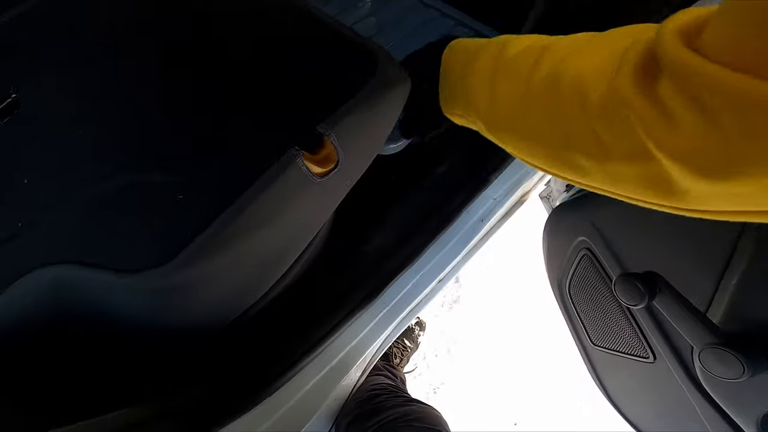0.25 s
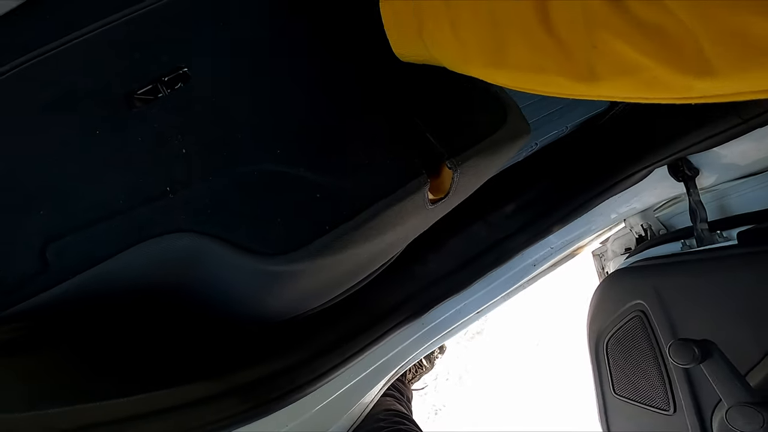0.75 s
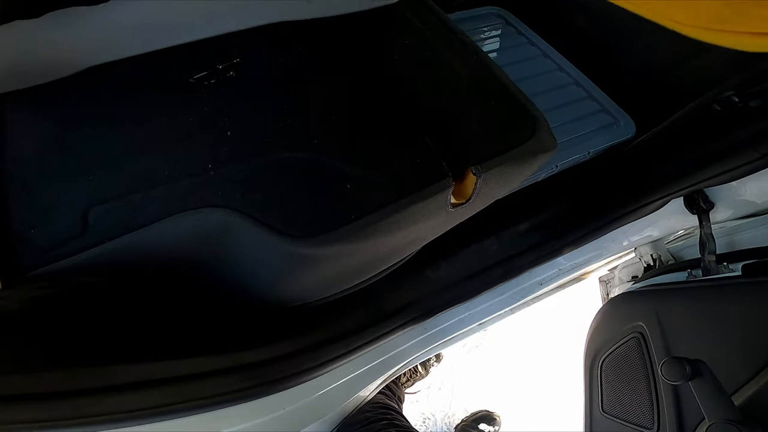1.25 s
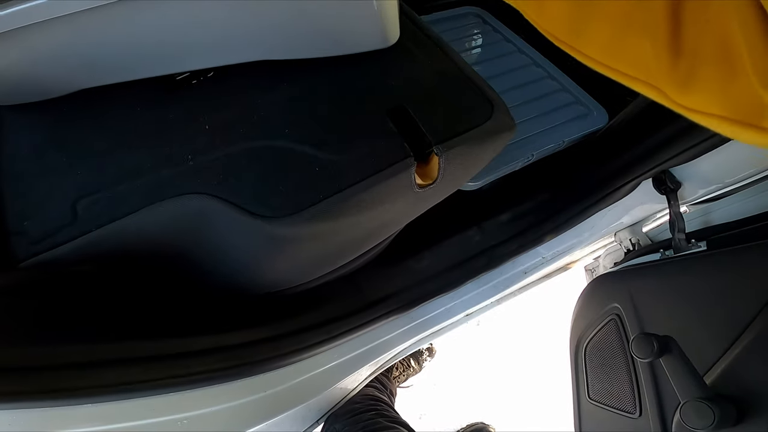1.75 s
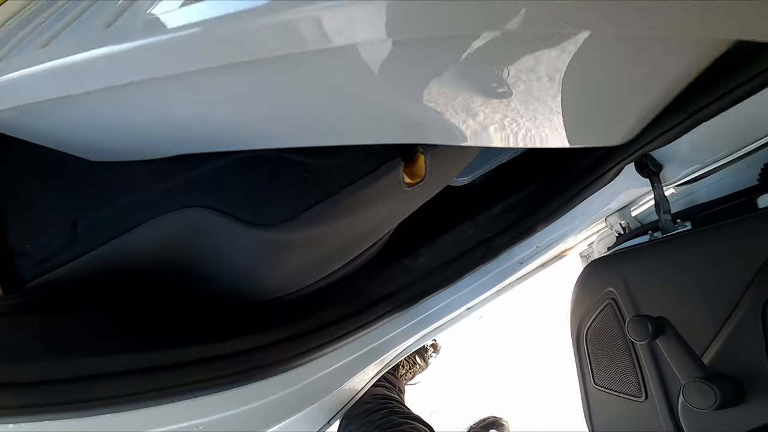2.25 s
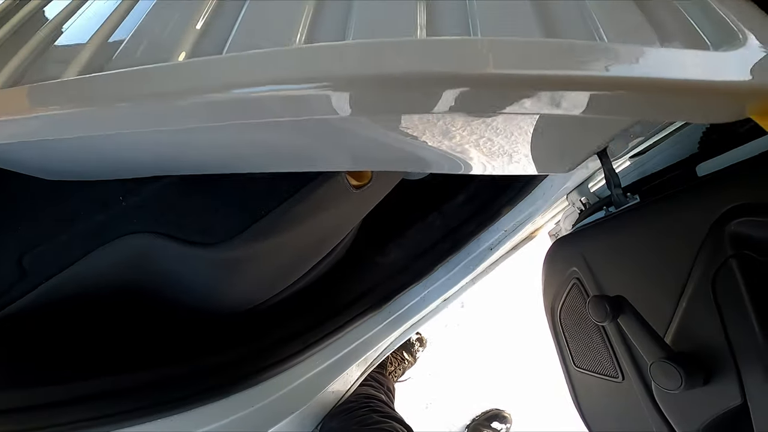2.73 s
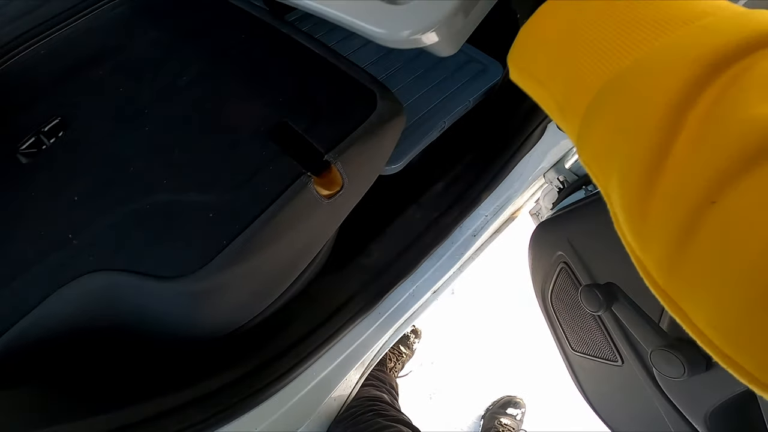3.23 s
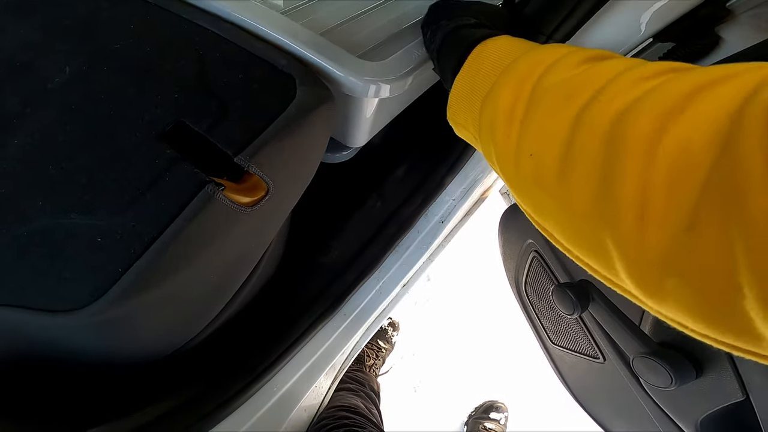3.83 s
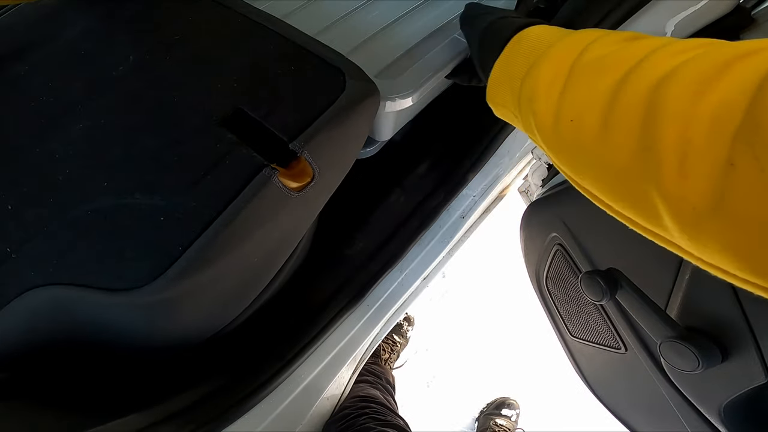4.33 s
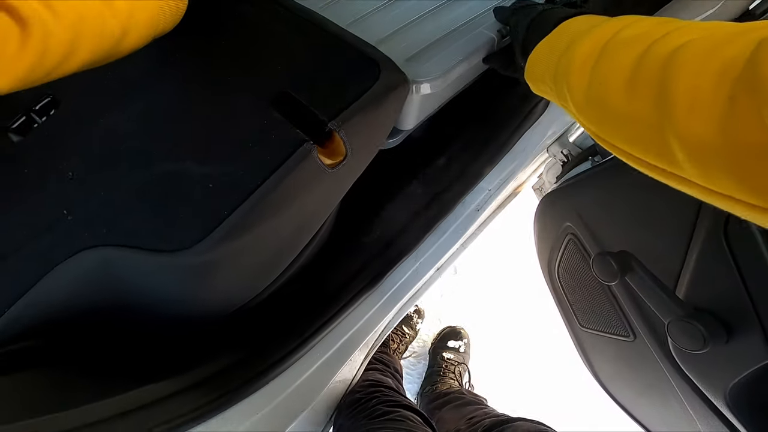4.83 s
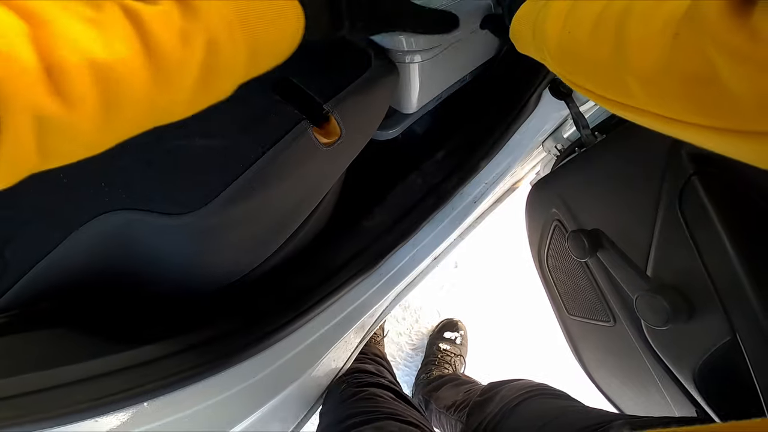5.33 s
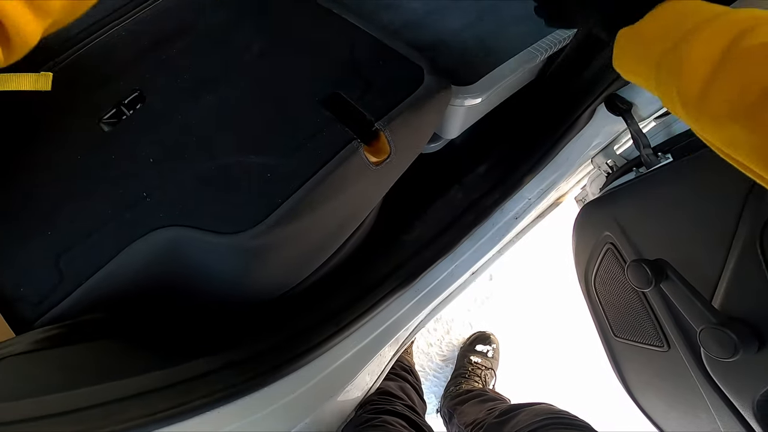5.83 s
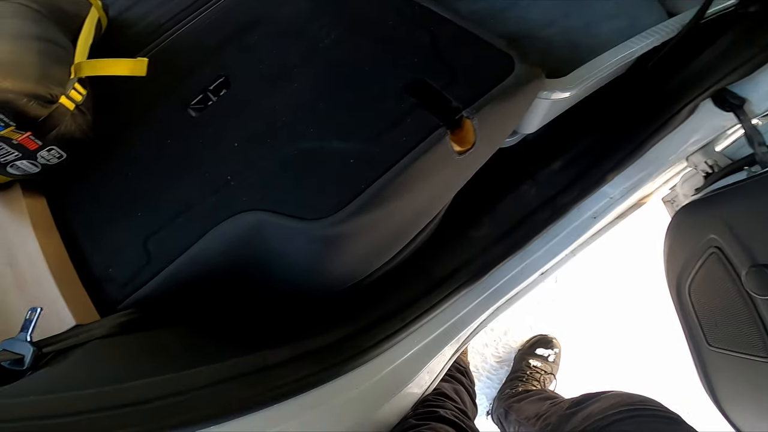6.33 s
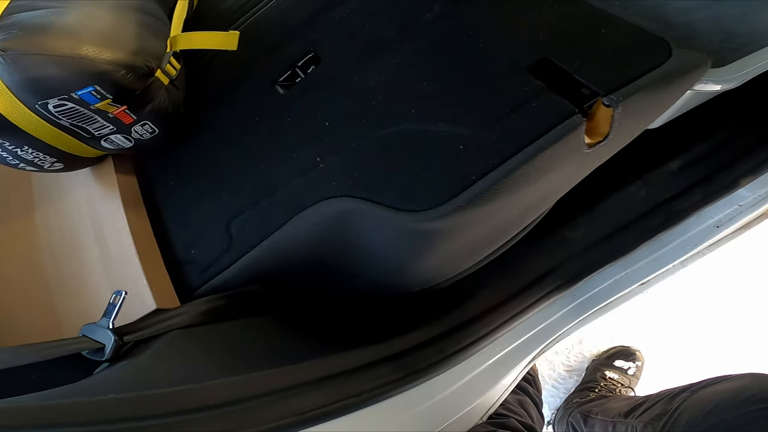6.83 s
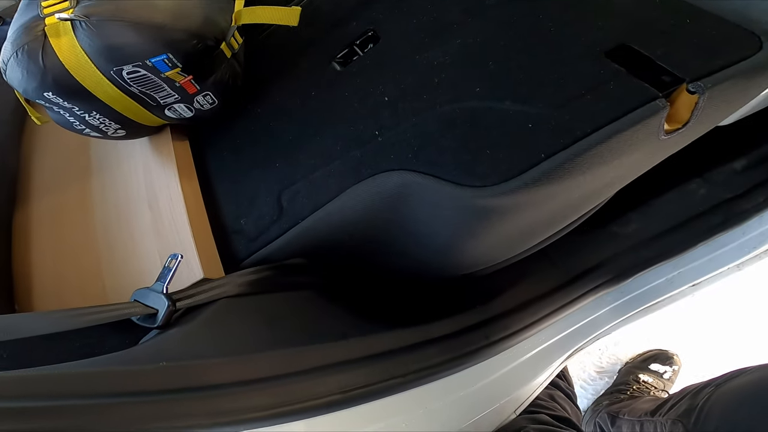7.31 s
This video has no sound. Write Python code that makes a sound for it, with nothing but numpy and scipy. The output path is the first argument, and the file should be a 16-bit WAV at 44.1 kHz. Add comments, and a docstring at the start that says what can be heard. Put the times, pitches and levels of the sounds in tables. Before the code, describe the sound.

A plastic crate is shoved about inside a parked car, heard close, the cabin giving each hit a short, dull tail. It opens with a heavy thump, a clack, a low boom and one brief squeak of a catch. Soft thuds and light clicks follow from about 0.6 to 1.6 seconds. Sharper hollow clacks strike near 1.9, 2.4 and 2.8 seconds. The loudest thumps and clattering plastic edges come between 3.4 and 3.7 seconds and again around 4.2. Between hits the crate drags over carpet and scuffs the trim, a padded jacket rustles, and small hard parts occasionally ping, while the car body booms low under the weight. After a quieter stretch, knocks build from 5.3 seconds into another cluster at 5.7 to 6. Then only faint ticks of shoes and clothing remain, with a soft bump near 7.2 seconds.

```python
"""A plastic crate is shoved about with other gear on the seat and floor of a parked car, its door open.
Blows thump the low modes of crate, seat and floor; hard edges clack on the trim and ring the walls.
Clumps of tiny slips make the drag over carpet, the scuff on trim and a padded jacket's close rustle.
A catch squeaks once at the start, small hard parts ping, and shoes and clothing tick near the end.
Underneath, the body shell booms with the weight; the cabin gives the hits a short, dull tail."""
import sys
import numpy as np
from scipy import signal
from scipy.fft import rfft, irfft
from scipy.io import wavfile

SR = 44100
rng = np.random.default_rng(int(sys.argv[2]) if len(sys.argv) > 2 else 0)


def digitize_waveform(pressure):
    """Quantize a signal to 16-bit integers and store it at the path in sys.argv[1].

    Rows of a 2-D input are taken as channels; values are limited to [-1, 1].
    """
    field = np.atleast_2d(pressure).T
    bounded = np.clip(field, -1, 1)
    quanta = np.round(bounded * 32767).astype(np.int16)
    wavfile.write(sys.argv[1], SR, quanta)


N = 333837

# boom modes of the car's shell: f/Hz, width/Hz, relative level/dB
SHELL_MODES = [(31.7, 6.9, 14), (43.7, 11, 12.5), (66.3, 17.2, 7.5)]
# weight shifting on the shell: t/s, boom level/dB
WEIGHT_SHIFTS = [(0.0, -17), (0.4, -47), (0.74, -48.5), (1.14, -22), (1.26, -24), (1.71, -44.5),
                 (2.21, -38), (2.55, -26.5), (3.1, -52), (3.27, -25.5), (3.42, -39), (3.71, -51),
                 (3.94, -49.5), (4.34, -32.5), (4.45, -45), (4.7, -61), (5.48, -43.5), (5.9, -29.5),
                 (6.49, -52), (6.81, -51), (7.08, -40.5), (7.57, -52.5)]
# how hard things rub: t/s, jacket level/dB, drag level/dB, scuff level/dB
RUB_LEVELS = [(0.0, -47, -13, -64), (0.06, -56, -28, -46.5), (0.21, -66.5, -37, -50.5),
              (0.36, -79, -52, -76.5), (0.59, -64.5, -57, -66), (0.76, -66.5, -51, -61),
              (1.26, -56, -44.5, -55.5), (1.71, -62, -43.5, -55.5), (2.0, -51.5, -40, -53),
              (2.4, -58.5, -42.5, -57), (2.55, -59, -49, -53), (2.78, -66, -47, -61.5),
              (2.93, -62, -44, -57.5), (3.27, -67, -46.5, -60), (3.52, -48, -33.5, -42.5),
              (3.6, -58.5, -37.5, -52.5), (3.92, -55, -34.5, -54.5), (4.11, -62, -38, -55.5),
              (4.28, -81, -39, -65.5), (4.45, -75, -57.5, -73), (4.74, -80, -51, -70),
              (5.02, -60, -43.5, -54), (5.78, -53, -33.5, -48), (5.88, -47, -35, -44),
              (6.09, -75.5, -50, -66), (6.35, -72.5, -48.5, -66), (6.56, -67, -50.5, -60.5),
              (7.57, -73, -44.5, -67)]
# brief dips in the rubbing: middle t/s, depth/dB (negative swells), half length/s
RUB_DIPS = [(0.492, 6.5, 0.061), (0.64, -2, .02), (2.03, 8, 0.08), (3.45, 5, 0.0097), (3.86, 6.5, 0.021),
            (4.025, 17, 0.035), (4.573, 3, 0.029), (4.85, 4, 0.0063), (5.23, 4.5, 0.041), (5.448, 8, 0.025),
            (5.497, 8.5, 0.0085), (5.857, 9.5, 0.0092), (6.079, -12, 0.024)]
# tone of the jacket's cloth: f/Hz, relative level/dB
JACKET_SPECTRUM = [(940, -23), (1600, -16), (1860, -7.5), (2360, -2.5), (3020, -3.5), (4300, -4),
                   (7820, -13.5), (8440, -12), (9020, -13.5), (13700, -22), (15500, -54.5)]
# tone of scuffing on trim: f/Hz, relative level/dB
SCUFF_SPECTRUM = [(350, -32), (600, -2), (1190, -6), (1280, -7.5), (1830, -12.5), (2400, -20), (3120, -56),
                  (5280, -120)]
# tone of the crate on carpet: f/Hz, relative level/dB
DRAG_SPECTRUM = [(35, -44.5), (60, -7.5), (82, -0.5), (107, -8), (199, -4.5), (241, -8), (339, -12.5),
                 (568, -14.5), (1000, -43), (1300, -47), (2200, -120)]
# single strokes of sleeve or crate over a surface: middle t/s, rms level/dB, centre f/Hz, half length/s
BRUSH_STROKES = [(0.956, -65.5, 2680, 0.11), (1.268, -63.5, 4770, 0.17), (1.873, -57, 4950, 0.058),
                 (3.343, -50.5, 3900, 0.014), (4.06, -63, 3900, 0.017), (4.277, -62, 3240, 0.031),
                 (5.05, -57, 2920, 0.035), (5.307, -51, 890, 0.036), (1.451, -52.5, 2500, 0.016),
                 (1.633, -54.5, 2670, 0.018), (1.639, -41, 583, 0.0097), (2.433, -51, 4900, 0.017),
                 (3.546, -44, 3900, 0.0037), (3.632, -51, 3830, 0.058), (3.925, -59.5, 3670, 0.042),
                 (4.15, -28, 2940, 0.0044), (4.667, -71, 3620, 0.057), (4.904, -50, 970, 0.012),
                 (5.122, -45.5, 3500, 0.018), (5.331, -50.5, 3670, 0.013), (5.48, -63, 4350, 0.01),
                 (5.607, -50, 2590, 0.023), (5.725, -52, 3930, 0.058), (6.155, -65.5, 3500, 0.019),
                 (6.549, -66.5, 3640, 0.067), (7.531, -48.5, 288, 0.052)]
# faint ticks of shoes and clothing: t/s, peak level/dB, centre f/Hz
SHOE_TICKS = [(6.287, -48, 630), (6.314, -47, 630), (6.329, -47, 640), (6.346, -46.5, 640),
              (6.388, -51, 1100), (6.498, -47, 872), (6.599, -42, 1310), (6.746, -61, 1610),
              (6.801, -47, 1290), (6.895, -54, 1020), (6.963, -44, 1320), (7.0, -45, 867),
              (7.194, -47.5, 1600), (7.209, -41, 829)]
# small hard parts ringing on one pitch: t/s, f/Hz, level/dB, t60/s
PART_PINGS = [(2.362, 7950, -45, 0.23), (2.363, 10300, -45, 0.13), (3.375, 6000, -39, 0.094),
              (3.376, 8400, -23.5, 0.021), (4.284, 1880, -62, 0.21), (6.052, 3630, -30.5, 0.042),
              (6.055, 8320, -43, 0.06)]
# path of the catch's squeak: t/s, f/Hz, level/dB
CATCH_PATH = [(0.083, 1530, -38), (0.099, 1675, -46.5), (0.155, 1647, -49.5), (0.2, 1660, -54)]
# tone of a plastic edge's chatter: f/Hz, relative level/dB
EDGE_SPECTRUM = [(940, -36.5), (1600, -5.5), (2030, -5), (2650, -5.5), (4860, -7.5), (5500, -9),
                 (6410, -11.5), (8440, -12.5), (10000, -21.5), (15500, -37.5)]
# modes of the crate's stiff rim: f/Hz, half width/Hz
RIM_MODES = [(2500, 210), (3250, 89), (4250, 480), (5500, 280), (8300, 70)]
# modes of the crate's walls: f/Hz, relative level/dB, t60/s
WALL_MODES = [(882, 2.5, .012), (1024, 3, .02), (1230, 5, 0.011), (1397, 3, 0.011), (1630, -5.5, 0.023),
              (1920, -3, .02)]
# hard edge hits: t/s, burst level/dB, wall level/dB, wall f/Hz, burst f/Hz, nominal chatter t60/s
EDGE_HITS = [(0.0412, -24.5, -24.5, 1450, 2220, 0.053), (0.0788, -31, -29, 1410, 3640, 0.21),
             (0.152, -37.5, -47, 1580, 2090, 0.039), (0.254, -52, -76, 980, 3970, 0.015),
             (0.273, -56, -54, 1460, 2350, 0.02), (0.6677, -42, -42.5, 1210, 3760, 0.098),
             (1.126, -44, -46, 1260, 2040, 0.027), (1.1473, -33, -44, 1320, 2400, 0.033),
             (1.4067, -37, -56, 1620, 2100, 0.051), (1.442, -39, -42, 1800, 4670, 0.15),
             (1.481, -37, -34, 990, 3410, 0.016), (1.53, -40.5, -38, 1200, 2750, 0.023),
             (1.558, -32, -34.5, 1140, 4750, 0.02), (1.765, -42, -37.5, 1260, 2030, 0.043),
             (1.8657, -23.5, -19.5, 1460, 2800, 0.024), (1.8807, -25.5, -22, 1080, 2050, 0.071),
             (1.9313, -18, -16, 1440, 2490, 0.014), (1.946, -33, -51, 1190, 3020, 0.035),
             (2.2088, -38, -36, 1490, 2800, 0.033), (2.3306, -36.5, -55, 1670, 2680, 0.04),
             (2.3683, -32, -38, 1270, 3030, 0.041), (2.3815, -13.5, -10.5, 1370, 2580, 0.015),
             (2.384, -9.5, -10.5, 1420, 5500, 0.032), (2.7789, -16.5, -19.5, 1230, 3170, 0.065),
             (2.8574, -37.5, -34, 1300, 2040, 0.17), (2.97, -44.5, -46, 1380, 4600, 0.048),
             (3.035, -32, -43, 1550, 3630, 0.06), (3.235, -34.5, -35, 1540, 3070, 0.076),
             (3.253, -34, -35.5, 1520, 2740, 0.098), (3.3729, -24, -17.5, 1090, 5940, 0.078),
             (3.4028, -24.5, -29, 1450, 2340, 0.16), (3.4789, -14.5, -17.5, 1250, 4000, 0.053),
             (3.4988, -20.5, -23, 1100, 3420, 0.031), (3.5385, -29.5, -43, 1380, 3270, 0.024),
             (3.564, -36, -48, 1160, 3500, 0.012), (3.59, -29.5, -49, 1450, 3540, 0.0078),
             (3.605, -28, -29, 1280, 2760, 0.0087), (3.653, -28, -33, 1340, 3200, 0.085),
             (3.6924, -18, -10.5, 1280, 2920, 0.08), (3.705, -14, -10, 1270, 2550, 0.043),
             (3.889, -39, -41, 1360, 3950, 0.11), (4, -48, -55, 1380, 2200, 0.014),
             (4.133, -26, -26.5, 1130, 2300, 0.059), (4.147, -21.5, -19.5, 1270, 2220, 0.066),
             (4.1736, -17.5, -19, 1060, 3420, 0.12), (4.2008, -9, -16, 1460, 4100, 0.024),
             (4.479, -47.5, -55, 1830, 2500, 0.1), (4.819, -37.5, -41, 1290, 2690, 0.042),
             (4.8346, -39, -60, 1690, 4030, 0.029), (4.9142, -49, -31.5, 1160, 3240, 0.044),
             (5.371, -35.5, -36, 1590, 3770, 0.04), (5.462, -39.5, -40, 1220, 3610, 0.18),
             (5.527, -31.5, -30, 1320, 2070, 0.081), (5.5636, -36, -33.5, 1150, 3890, 0.036),
             (5.682, -21.5, -43, 1380, 4540, 0.055), (5.8215, -15.5, -24, 1380, 2530, 0.034),
             (5.837, -38, -52, 1420, 2300, 0.03), (5.876, -26, -35, 1560, 2790, 0.029),
             (5.886, -18, -27, 1290, 4550, 0.043), (5.925, -22, -27.5, 1680, 3270, 0.022),
             (5.9599, -25.5, -29, 1590, 2060, 0.061), (6.0554, -31, -33, 1320, 3550, 0.066),
             (7.232, -43.5, -40.5, 1220, 2230, 0.045)]
# modes of crate, seat and floor pan: f/Hz
BODY_MODES = [68, 86, 110, 131, 155, 180, 208, 245, 290, 334, 375, 430, 510, 600, 690]
# dull blows on crate and floor: t/s, peak level/dB, centre f/Hz, upper-mode trim/dB, nominal t60/s
BLOWS = [(0.005, -7.5, 166, -31, 0.062), (0.044, -6, 251.5, -19.5, 0.1), (0.062, -20, 213, -28, .1),
         (0.08, -13.5, 81, -5, 0.11), (0.114, -21, 301, -24, 0.37), (0.168, -12.5, 173, -12, 0.12),
         (0.553, -26.5, 102, -23, 0.088), (0.62, -31, 121, -17, 0.022), (0.671, -15.5, 176, -6, 0.061),
         (0.705, -37, 400, -25, 0.055), (0.75, -36.5, 300, -19, 0.08), (0.898, -18.5, 67, -31, 0.36),
         (0.991, -25, 131, -22, 0.16), (1.099, -16.5, 95, -33, 0.079), (1.12, -10.5, 109, -37, 0.19),
         (1.147, -10.5, 123, -26, 0.15), (1.194, -13.5, 84, -51, 0.2), (1.306, -22.5, 93, -46, 0.22),
         (1.317, -32.5, 400, -25, 0.068), (1.399, -22.5, 128, -3.5, 0.081), (1.449, -26.5, 116, -7, 0.24),
         (1.479, -20, 75, 14, 0.08), (1.558, -15.5, 76, -12, 0.17), (1.722, -30, 72.5, -9, 0.077),
         (1.793, -21, 213, -7, 0.074), (1.864, -16.5, 183, 14, 0.087), (1.882, -14, 230, -8, 0.052),
         (1.929, -18, 554, -18, 0.045), (2.208, -22, 470, -34, 0.027), (2.368, -14, 102, -15, 0.34),
         (2.38, -14, 147, -10, 0.14), (2.417, -19.5, 114, -14, 0.4), (2.779, -7, 146, 2, 0.03),
         (2.808, -18.5, 195, -23, 0.12), (2.835, -17.5, 159, -31, 0.066), (2.856, -13.5, 172, -18, 0.1),
         (2.959, -23, 282, -35, 0.078), (3.034, -11, 231, -34, 0.064), (3.139, -27, 99, -25, 0.18),
         (3.232, -11, 96, -18, 0.057), (3.371, -13.5, 606, -44, 0.037), (3.4, -17, 198, -12, 0.14),
         (3.48, -1.5, 204, -10, 0.12), (3.502, -7.5, 182, -15, 0.19), (3.571, -14.5, 414, -32, 0.058),
         (3.624, -18.5, 404, -28, 0.078), (3.646, -9.5, 116.4, -11, 0.051), (3.694, -1, 178, -3.5, 0.12),
         (3.721, -12.5, 129, -20, 0.37), (3.898, -34.5, 175, -15.5, 0.3), (4.133, -9, 183, -17.5, 0.13),
         (4.151, -6, 173.5, -11, 0.15), (4.176, -12, 190, -8, 0.058), (4.202, -2, 190, -6, 0.098),
         (4.22, -14.5, 124, -41, 0.097), (4.446, -34.5, 152, -24, .06), (4.709, -35.5, 70, -30, 0.26),
         (4.819, -26.5, 189, -15, 0.083), (5.028, -30, 74.6, -22, 0.55), (5.335, -22.5, 190, -16.5, 0.27),
         (5.373, -14.5, 220, -22, 0.042), (5.456, -30.5, 198, -41, 0.33), (5.529, -23.5, 207, -21, 0.15),
         (5.564, -21, 85, -7, 0.098), (5.683, -10.5, 169, -9, 0.11), (5.823, -9.5, 136, -12.5, 0.14),
         (5.888, -15.5, 78, -7, 0.095), (5.927, -7, 113, -8.5, 0.048), (5.956, -9.5, 141, -11.5, 0.082),
         (6.059, -27, 75, 5, 0.38), (6.955, -34, 72, -30, 0.1), (7.079, -32.5, 207, -29, 0.16),
         (7.229, -24, 152, -19, 0.11)]


def from_db(db):
    """Decibels to gain."""
    return 10 ** (np.asarray(db) / 20)


def rms_one(x):
    """Scale to rms 1."""
    return x / np.sqrt(np.mean(x ** 2) + 1e-20)


def peak_at(x, db):
    """Scale to a peak of db."""
    return from_db(db) * x / np.abs(x).max()


def bell(offset, spread):
    """Bell curve, 1 at zero offset."""
    return np.exp(-.5 * (offset / spread) ** 2)


def curves(rows):
    """Draw each column of a timed table as a curve over the whole scene."""
    times, *columns = np.transpose(rows)
    return [np.interp(np.arange(N) / SR, times, column) for column in columns]


def db_at(spectrum, hz):
    """Read a spectrum on a log-frequency axis."""
    points_hz, db = np.transpose(spectrum)
    return np.interp(np.log(hz), np.log(points_hz), db)


def drift(rate):
    """Smooth random wander of rms 1, changing about rate times a second."""
    hop = 40
    r = np.exp(-2 * np.pi * rate * hop / SR)
    slow = signal.lfilter([1], [1, -2 * r, r * r], rng.standard_normal(N // hop + 2002))[2000:]
    return np.interp(np.arange(N) / hop, np.arange(len(slow)), rms_one(slow))


def resonance(x, hz, width_hz):
    """Two-pole resonance, gain 1 at its peak."""
    r = np.exp(-np.pi * width_hz / SR)
    gain = (1 - r * r) / 2
    return signal.lfilter([gain, 0, -gain], [1, -2 * r * np.cos(2 * np.pi * hz / SR), r * r], x)


def add(out, s, sound):
    """Mix a short sound in at time s."""
    i = max(round(s * SR), 0)
    out[i:i + len(sound)] += sound[:N - i]


def friction(spectrum, slips_per_s, spread_db, hiss, flicker_db, flicker_rate):
    """Tiny slips of uneven size come in clumps over smooth hiss, coloured and flickering; rms 1."""
    sizes = from_db(spread_db * np.minimum(rng.exponential(1, N), 5)) * rng.choice([-1, 1], N)
    slips = sizes * (rng.random(N) < slips_per_s * from_db(3 * drift(15)) / SR)
    rub = rms_one(slips) + hiss * rng.standard_normal(N)
    hz = np.maximum(np.arange(N // 2 + 1) * SR / N, 1)
    rub = irfft(rfft(rub) * from_db(db_at(spectrum, hz)), N)
    return rms_one(rub * from_db(flicker_db * drift(flicker_rate)))


def after_blows(power, rise_s, t60):
    """A power envelope that swells after each blow and dies away."""
    kicks, t = np.zeros(N), np.arange(SR) / SR
    np.add.at(kicks, (np.array(BLOWS)[:, 0] * SR).astype(int), power)
    swell = (1 - np.exp(-t / rise_s)) * from_db(-120 * t / t60)
    return np.maximum(signal.fftconvolve(kicks, swell)[:N], 0)


def cabin_reverb(x, level_db=-20, t60=0.13, upholstery_hz=2254):
    """The cabin's short tail, its highs soaked up by upholstery."""
    t = np.arange(SR // 3) / SR
    tail = rng.standard_normal(len(t)) * from_db(-60 * t / t60) * (t > .003)
    tail = signal.lfilter(*signal.butter(1, upholstery_hz, fs=SR), tail)
    return from_db(level_db) * signal.fftconvolve(x, tail / np.sqrt(np.sum(tail ** 2)))[:N]


def shell_boom(rock_db=-16, middling_hz=150):
    """Shell and cabin air rock under shifted weight and after each blow, more after a low one."""
    weight_db, = curves(WEIGHT_SHIFTS)
    _, blow_db, blow_hz, *_ = np.transpose(BLOWS)
    blow_power = from_db(2 * (blow_db + rock_db)) * (middling_hz / blow_hz) ** 1.96
    rock = after_blows(blow_power, rise_s=0.032, t60=0.36)
    push = rng.standard_normal(N)
    modes = sum(from_db(db) * resonance(resonance(push, hz, width), hz, 2 * width)
                for hz, width, db in SHELL_MODES)
    return np.sqrt(from_db(2 * weight_db) + rock) * rms_one(modes)


def rub_dips():
    """Level ride in dB for the rubbing: it ducks for a moment, or now and then swells."""
    t = np.arange(N) / SR
    return -sum(db * bell(t - s, half_s) for s, db, half_s in RUB_DIPS)


def jacket_rustle(level_db, patch_db=5.0):
    """Cloth crinkles on cloth; as folds come and go, narrow bands stand out in patches."""
    rub = friction(JACKET_SPECTRUM, slips_per_s=2000, spread_db=2.4, hiss=1.0,
                   flicker_db=2.2, flicker_rate=34)
    folds = sum(from_db(patch_db * drift(7)) * resonance(rub, hz, 0.2 * hz)
                for hz in np.geomspace(1800, 8400, 10))
    return from_db(level_db) * rms_one(rub + folds)


def trim_scuff(level_db):
    """Rubbing on the trim: a fluttering midrange hiss with sparse slips."""
    return from_db(level_db) * friction(SCUFF_SPECTRUM, slips_per_s=230, spread_db=3.2, hiss=2.0,
                                        flicker_db=3.5, flicker_rate=22)


def brush_strokes(width=0.49, grain_db=5.5):
    """Sleeve or crate brushes a surface: a broad, grainy band swells and fades."""
    out, t = np.zeros(N), np.arange(-8192, 8192) / SR
    shape = len(BRUSH_STROKES), len(t)
    grit = rng.standard_normal(shape) * from_db(grain_db * rng.standard_normal(shape))
    for (s, db, hz, half_s), rub in zip(BRUSH_STROKES, grit):
        band = rms_one(resonance(resonance(rub, hz, width * hz), hz, 2 * width * hz))
        add(out, s + t[0], from_db(db) * band * bell(t, half_s))
    return out


def shoe_ticks(width=0.37):
    """Dry ticks of shoes and clothing, each one click through a wide resonance."""
    out, click = np.zeros(N), signal.unit_impulse(512)
    for s, db, hz in SHOE_TICKS:
        tick = resonance(resonance(click, hz, width * hz), hz, width * hz)
        add(out, s, peak_at(tick, db))
    return out


def part_pings(rise_s=0.0033):
    """Small hard parts ring on one mode each, with a softened attack."""
    out, t = np.zeros(N), np.arange(SR // 4) / SR
    for s, hz, db, t60 in PART_PINGS:
        envelope = from_db(db - 60 * t / t60) * (1 - np.exp(-t / rise_s))
        add(out, s, envelope * np.sin(2 * np.pi * hz * t))
    return out


def catch_squeak(waver_hz=22, flutter_db=4.9, fade_s=0.0055):
    """A short stick-slip whistle, shaky in level and pitch, with a weak second mode."""
    hz, db = curves(CATCH_PATH)
    t = np.arange(N) / SR
    gate = np.clip(np.minimum(t - CATCH_PATH[0][0], CATCH_PATH[-1][0] - t) / fade_s, 0, 1)
    phase = 2 * np.pi * np.cumsum(hz + waver_hz * drift(143)) / SR
    whistle = np.sin(phase) + .1 * np.sin(2.4 * phase)
    return gate * from_db(db + flutter_db * drift(60)) * whistle


def crate_drag(level_db, slide_db=-14.5, ring_db=-10.5, wander_db=8.6):
    """The crate grinds over carpet and slides on after each blow; body modes drift in and out."""
    slide = after_blows(from_db(2 * (np.array(BLOWS)[:, 1] + slide_db)), rise_s=0.002, t60=0.14)
    rub = friction(DRAG_SPECTRUM, slips_per_s=500, spread_db=3.2, hiss=1.0,
                   flicker_db=1.4, flicker_rate=32)
    ring = sum(from_db(wander_db * drift(2.2)) * resonance(rub, hz, 0.037 * hz) for hz in BODY_MODES[4:])
    return np.sqrt(from_db(2 * level_db) + slide) * rms_one(rub + from_db(ring_db) * ring)


def through_rim(burst, mode_gains, rim_db=-5.0):
    """Chatter briefly rings the stiff rim, each mode with a strength of its own."""
    f = np.arange(len(burst) // 2 + 1) * SR / len(burst)
    hz, half_width = np.array(RIM_MODES).T[:, :, None]
    modes = np.sum(mode_gains / (1 + 1j * (f - hz) / half_width), axis=0)
    return irfft(rfft(burst) * (1 + from_db(rim_db) * modes))


def wall_ring(t, centre_hz, mode_gains, reach=0.19, rise_s=0.0008):
    """The hollow part of a clack: wall modes near the centre pitch ring and die fast."""
    hz, db, t60 = np.array(WALL_MODES).T[:, :, None]
    strength = bell(np.log(hz / centre_hz), reach) * mode_gains
    modes = strength * from_db(db - 60 * t / t60) * np.sin(2 * np.pi * hz * t)
    return modes.sum(axis=0) * (1 - np.exp(-t / rise_s))


def crate_clacks(bite_s=.002, chatter_db=-3, lift_db=5.5, mode_spread_db=3.0):
    """A plastic edge skids, bites and chatters: a bright burst that rings the rim and walls."""
    size, lead_s = 4096, 1024 / SR
    out, t = np.zeros(N), np.arange(size) / SR
    f = np.maximum(np.arange(size // 2 + 1) * SR / size, 1)
    before, after = np.minimum(t - lead_s, 0), np.maximum(t - lead_s, 0)
    walls = len(WALL_MODES)
    grits = rng.standard_normal((len(EDGE_HITS), size)) ** 3   # cubed for a spiky grain
    mode_gains = from_db(mode_spread_db * rng.standard_normal((len(EDGE_HITS), walls + len(RIM_MODES), 1)))
    for (s, db, wall_db, wall_hz, burst_hz, t60), grit, gains in zip(EDGE_HITS, grits, mode_gains):
        tilt_db = 0.13 * (db + 22) * np.log2(f / 3000) ** 2 * (f > 3000)   # harder hits are brighter
        bump_db = lift_db * bell(np.log(f / burst_hz), 0.15)
        chatter = irfft(rfft(grit) * from_db(db_at(EDGE_SPECTRUM, f) + tilt_db + bump_db))
        skid = np.exp(before / np.clip(0.056 * t60, .0003, .006))   # long chatter builds more slowly
        fade = np.exp(-after / bite_s) + from_db(chatter_db - 60 * after / np.clip(t60, .006, .15))
        burst = through_rim(chatter * skid * fade, gains[walls:])
        add(out, s - lead_s, peak_at(burst, db))
        add(out, s, peak_at(wall_ring(t, wall_hz, gains[:walls]), wall_db))
    return out


def crate_thumps(reach=0.24, contact_s=0.0029, upper_hz=417, hard_db=5.0, mode_spread_db=3.46):
    """A soft blow rings body modes near its pitch; a harder one reaches upper modes, which die sooner."""
    out, t = np.zeros(N), np.arange(SR // 4) / SR
    hz = np.array(BODY_MODES)[:, None]
    upper_modes = bell(np.log(hz / upper_hz), 0.36)
    attack = 1 - np.exp(-t / contact_s)
    variations = rng.standard_normal((len(BLOWS), 2, len(BODY_MODES), 1))
    for (s, db, centre_hz, upper_db, t60), (scatter, load) in zip(BLOWS, variations):
        thud = bell(np.log(hz / centre_hz), reach)
        knock = from_db(upper_db + hard_db) * upper_modes * np.sign(load)
        strength = (thud + knock) * from_db(mode_spread_db * scatter)
        fade = from_db(-60 * t / np.clip(t60, .02, .3) * (hz / centre_hz) ** 0.76)
        loaded_hz = hz * (1 + 0.041 * load)   # grip and load detune the modes from blow to blow
        modes = strength * fade * np.sin(2 * np.pi * loaded_hz * t)
        add(out, s, peak_at(modes.sum(axis=0) * attack, db))
    return out


def scene():
    """Mono mix: hits and squeak with a touch of cabin, over shell boom and dry rubbing."""
    jacket_db, drag_db, scuff_db = curves(RUB_LEVELS) + rub_dips()
    hits = crate_thumps() + crate_clacks() + shoe_ticks() + part_pings() + catch_squeak()
    rubbing = crate_drag(drag_db) + trim_scuff(scuff_db) + jacket_rustle(jacket_db) + brush_strokes()
    return (hits + cabin_reverb(hits) + shell_boom() + rubbing)[None]


def record(dry, stop_hz=15900):
    """Soft saturation rounds the peaks; a steep low-pass takes off the very top."""
    rounded = 1.012 * np.tanh(dry / 0.93)
    return signal.sosfilt(signal.cheby2(12, 70, stop_hz, fs=SR, output="sos"), rounded)


dry = scene()
out = record(dry)
digitize_waveform(out)
```